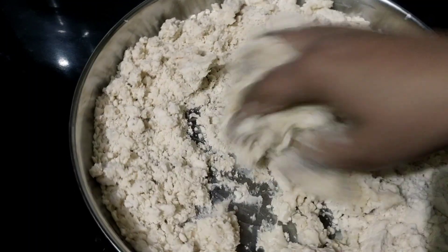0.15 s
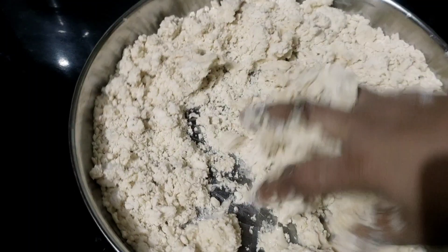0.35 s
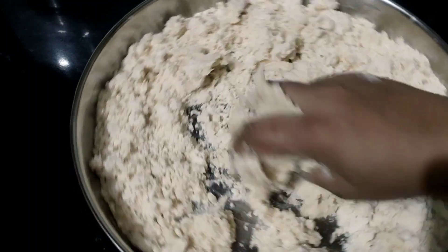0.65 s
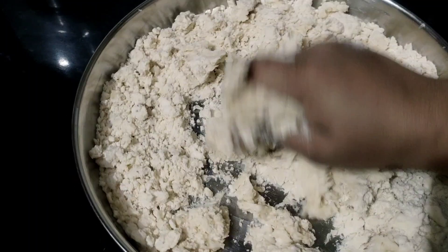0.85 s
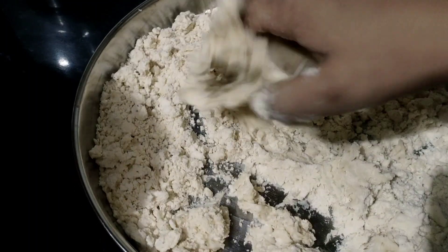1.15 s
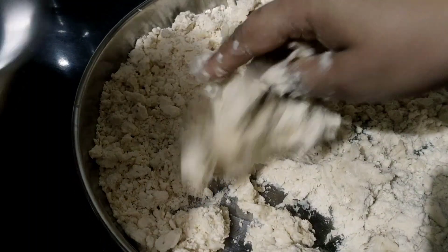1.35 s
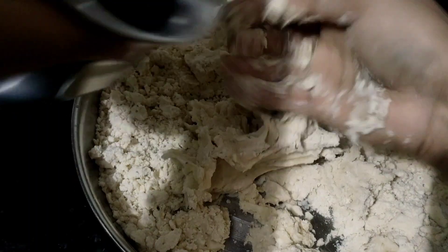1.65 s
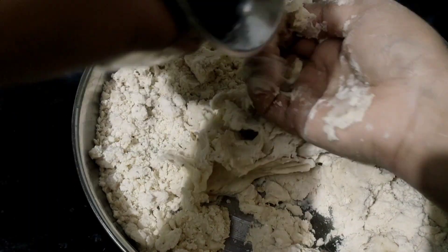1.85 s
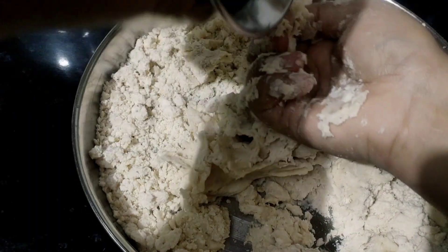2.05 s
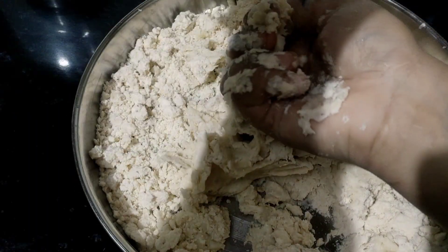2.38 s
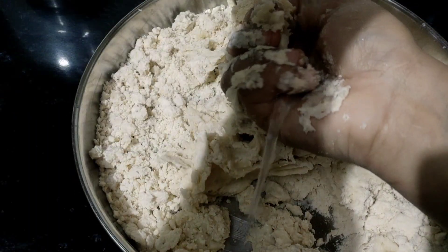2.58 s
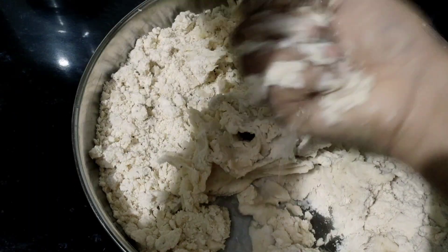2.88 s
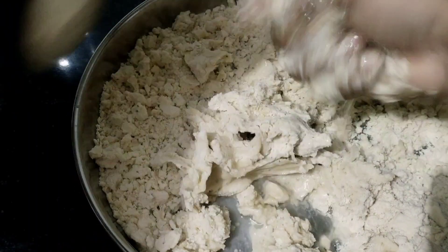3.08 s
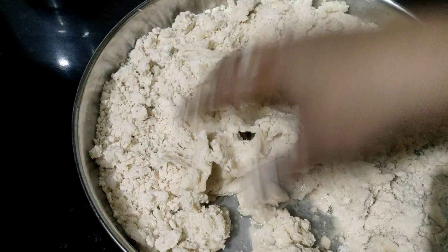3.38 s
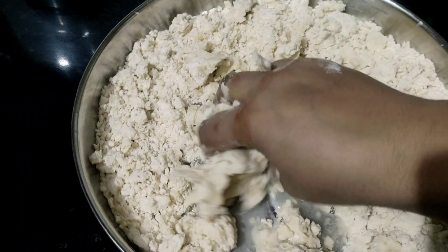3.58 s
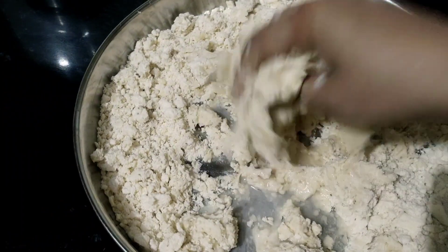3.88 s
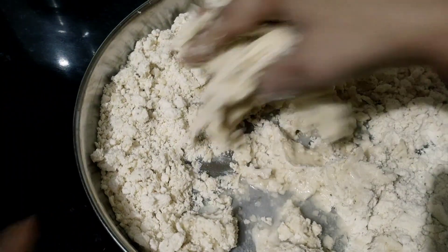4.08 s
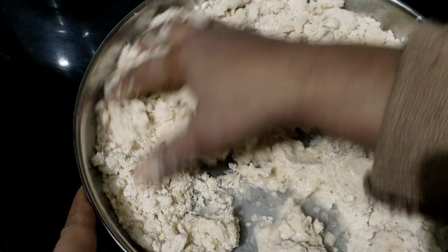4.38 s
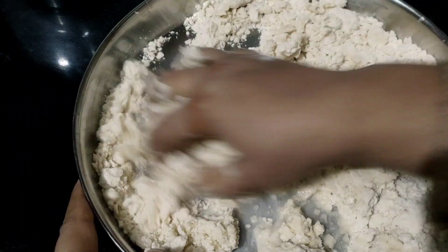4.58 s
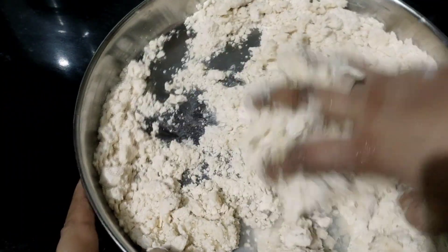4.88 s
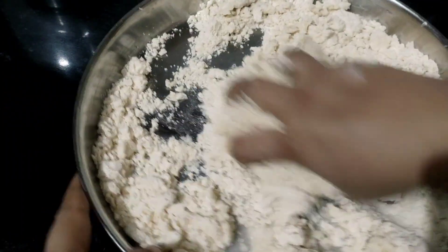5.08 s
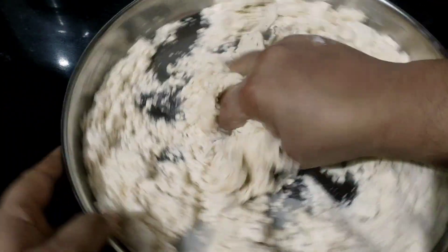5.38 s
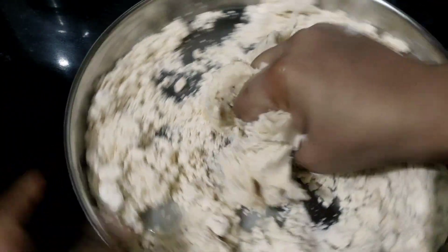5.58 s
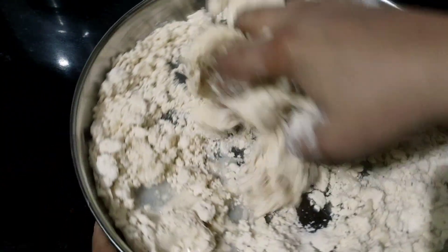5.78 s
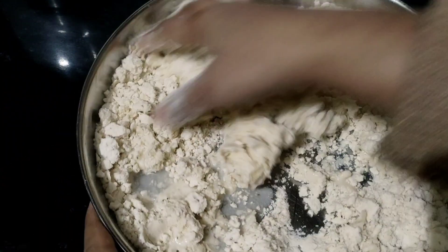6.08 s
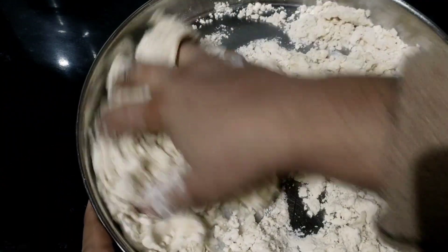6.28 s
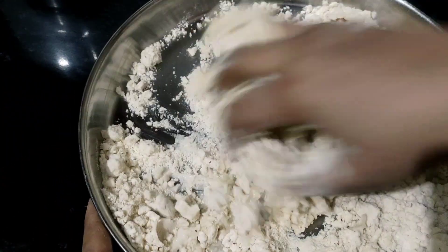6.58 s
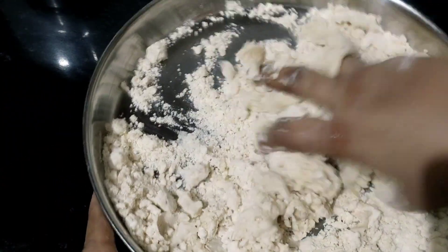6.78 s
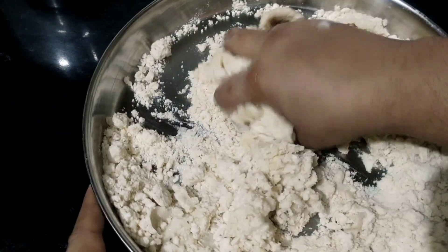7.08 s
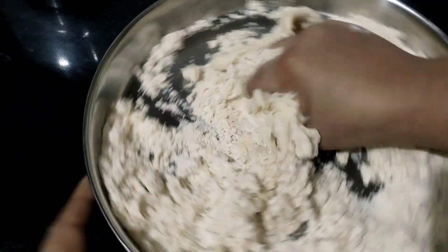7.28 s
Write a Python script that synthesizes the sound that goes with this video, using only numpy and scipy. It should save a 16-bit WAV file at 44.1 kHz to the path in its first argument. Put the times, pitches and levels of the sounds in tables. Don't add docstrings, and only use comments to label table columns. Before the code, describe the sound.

A close stereo phone pickup in a hard, lively kitchen, with a low house drone that is strongest at first and then eases. From 0 to 0.6 s, knuckles knock dully on a dough-damped steel plate, crumbs rub, and a nail judders at 0.5. Soft knocks follow at 0.8 and 1.0, a brushing stroke at 1.2, and a faint unsteady pipe whine until about 2.1. Water trickles from 2.5 to 3.3, with fine bubbling and bright plinks, clearest near 3.0 to 3.2. A far horn wavers from 2.9 to 4.4. At 3.56 a steel tumbler lands hard, the loudest sound, rings, touches again and rocks at 3.8. From 4.1, grainy kneading swishes return with small bangle clinks, a low air puff at 5.7 left, and a bright clink at 6.1. A firmer thud and rub come at 6.95, a light clink at 7.15, and a fluttering, buzzing horn from 7.0 to the end at about 7.4.

```python
import sys
import numpy as np
from scipy import signal
from scipy.fft import rfft, irfft
from scipy.io import wavfile
from scipy.ndimage import uniform_filter1d

SR = 44100
rng = np.random.default_rng(int(sys.argv[2]) if len(sys.argv) > 2 else 0)


def ratio_of_db(decibels):
    return 10 ** (np.asarray(decibels, float) / 20)


def wav_out(sig):
    wavfile.write(sys.argv[1], SR, np.round(np.clip(np.atleast_2d(sig).T, -1, 1) * 32767).astype(np.int16))


N = 328104
TIME = np.arange(N) / SR
SIDES = np.array([[.5], [-.5]])

# (centre [Hz], width [Hz], gain [dB])
STEEL_GAPS = [(4280, 330, -14), (6250, 480, -12)]


def on_log(table, hz, column=1):
    table = np.array(table)
    return np.interp(np.log(hz + 1), np.log(table[:, 0]), table[:, column])


def colour(x, table):
    hz = np.arange(x.shape[-1] // 2 + 1) * SR / x.shape[-1]
    octaves_beyond = np.log2(np.clip(hz + 1, table[0][0], table[-1][0]) / (hz + 1))
    gain = ratio_of_db(on_log(table, hz) - 36 * abs(octaves_beyond))
    return irfft(rfft(x) * gain / np.sqrt(np.mean(gain ** 2)), x.shape[-1])


def notch(x, dips):
    hz = np.arange(N // 2 + 1) * SR / N
    gain_db = sum(db * np.exp(-((hz - dip_hz) / width * 2) ** 2) for dip_hz, width, db in dips)
    return irfft(rfft(x) * ratio_of_db(gain_db), N)


def curve(table):
    s, db = np.transpose(table)
    return np.interp(TIME, s, db)


def walk(rate):
    k = int(SR / rate)
    held = np.repeat(rng.standard_normal(N // k + 1), k)
    return 1.7 * uniform_filter1d(uniform_filter1d(held, k), k)[:N]


def add(out, s, sound, pan_db=0):
    i = int(s * SR)
    sound = sound[..., :N - i]
    out[:, i:i + sound.shape[-1]] += sound * ratio_of_db(pan_db * SIDES)


def correlate(mid, side, likeness):
    c = np.clip(likeness, 0, 1)
    return np.sqrt((1 + c) / 2) * mid + np.sqrt((1 - c) / 2) * side * 2 * SIDES


def pair(likeness, count=N):
    mid, side = rng.standard_normal((2, count))
    return correlate(mid, side, likeness)


def ring(modes, seconds, flutter_db, scatter=1):
    hz, db, t60 = np.transpose(modes)[:, :, None]
    t = np.arange(int(seconds * SR)) / SR
    steps = rng.standard_normal((2, len(modes), len(t) // 500 + 1))
    flutter = uniform_filter1d(np.repeat(steps, 500, axis=2), 500)[..., :len(t)]
    flutter = flutter * (1 - np.exp(-t / .03))
    phase = 2 * np.pi * (hz * t + scatter * rng.random(hz.shape)) + .05 * flutter_db * flutter
    decay = np.exp(-np.log(1000) * t / t60)
    onset = 1 - np.exp(-t / 0.00054)
    return np.sum(ratio_of_db(db + flutter_db * flutter) * decay * np.sin(phase), axis=1) * onset


def house():
    # (frequency [Hz], correlation [0-1])
    coherence = [(100, 0.98), (300, .85), (700, .6), (3000, 0), (8000, 0)]
    # (frequency [Hz], density [dB per Hz])
    spectrum = [(56, 0.5), (156, -1), (240, -20), (350, -21), (480, -33.5), (1900, -45.5), (5460, -61.5),
                (15000, -53)]
    # (time [s], level [dB])
    bass_level = [
        (0.0, -46.5),
        (2.5, -51),
        (5.66, -53.5),
        (5.86, -52),
        (7.44, -53.5),
    ]
    hz = np.arange(N // 2 + 1) * SR / N
    mid, side = rfft(rng.standard_normal((2, N)))
    both = colour(irfft(correlate(mid, side, on_log(coherence, hz)), N), spectrum)
    bass = signal.sosfiltfilt(signal.butter(2, 230, fs=SR, output="sos"), both)
    bass_rms = np.sqrt(uniform_filter1d(np.mean(bass ** 2, axis=0), 6000))
    return bass / bass_rms * ratio_of_db(curve(bass_level) - 2.5) + (both - bass) * ratio_of_db(-47.0)


def blows(groups):
    # (frequency [Hz], width [Hz], level [dB])
    plate_modes = [(298, 45, 4.5), (359, 51, -2.5), (460, 360, -9.5), (575, 70, 4), (672, 150, -8.5),
                   (783, 46, -7), (899, 60, -7.5), (1027, 110, -7)]
    # (frequency [Hz], density [dB per Hz])
    knock_spectrum = [(500, -20.5), (900, -1), (1400, 0), (2100, 5), (3000, -3.5), (4500, -16.5)]
    tick_spectrum = [(2500, -11.5), (4000, -1.5), (7000, -1), (11000, 1.5), (15500, -6), (16500, -16)]
    crisp_spectrum = [(2500, -15.5), (4000, -6.5), (6800, -2), (8800, -4.5), (10500, 0.5), (14500, -0.5),
                      (15800, -6), (16500, -18)]
    thud, knock, tick, crisp = np.zeros((4, 2, N))
    t = np.arange(6000) / SR
    for table, rise, contact, hollow_db, is_crisp in groups:
        push = 1 - np.exp(-t / (rise * contact))
        ticking = crisp if is_crisp else tick
        for s, thud_db, hz, tick_db in table:
            place = signal.butter(2, [hz / 1.8, hz * 1.485], "band", fs=SR, output="sos")
            burst = pair(0.94, len(t)) * push * np.exp(-t / (1.69 * contact))
            add(thud, s, ratio_of_db(thud_db) * signal.sosfilt(place, burst))
            burst = pair(0.6, len(t)) * push * np.exp(-t / contact)
            add(knock, s, ratio_of_db((thud_db + tick_db) / 2 + hollow_db) * burst)
            burst = pair(0.91, len(t)) * push * np.exp(-t / (0.67 * contact))
            add(ticking, s, ratio_of_db(tick_db) * burst)
    plate = sum(ratio_of_db(db) * signal.lfilter(*signal.iirpeak(hz, hz / width, SR), thud)
                for hz, width, db in plate_modes)
    ticks = ratio_of_db(1.0) * colour(tick, tick_spectrum) + ratio_of_db(2.0) * colour(crisp, crisp_spectrum)
    return ratio_of_db(17.0) * plate + ratio_of_db(1.0) * colour(knock, knock_spectrum) + ticks


def clacks():
    # (time [s], level [dB], frequency [Hz], t60 [s])
    bare_patches = [(.405, -29, 739, 0.18), (.405, -36.5, 1954, .07), (3.558, -21.5, 1064, .07),
                    (.014, -22.5, 385, 0.15), (.166, -32.5, 333, .1), (0.407, -43, 2900, .05),
                    (3.07, -40.5, 1650, 0.068), (3.806, -27, 904, .08), (5.066, -32, 271, 0.12),
                    (.78, -44, 6040, 0.037), (0.78, -30, 2020, 0.034), (0.781, -38.5, 1397, 0.17),
                    (3.073, -41, 1730, 0.034), (3.225, -45.5, 1670, 0.034), (4.36, -42, 1276, 0.055),
                    (4.475, -41, 442, 0.15), (5.067, -31.5, 400, 0.15), (5.24, -50.5, 993, 0.077),
                    (6.04, -48, 909, 0.25), (6.079, -37, 1290, 0.08), (6.256, -53, 1108, 0.093)]
    out = np.zeros((2, N))
    for s, db, hz, t60 in bare_patches:
        modes = [(hz * k, db - 11, max(0.9 * t60, .02)) for k in (.84, .92, 1, 1.1, 1.22)]
        add(out, s, ring(modes, 0.32, flutter_db=6.0))
    return out


def kneading():
    # (time [s], thud level [dB], thud frequency [Hz], tick level [dB])
    knuckles = [(.013, -23, 470, -46), (.0145, -33, 890, -56), (.069, -39.5, 424, -53),
                (.165, -27, 620, -24.5), (.179, -30.5, 327, -42), (4.489, -51, 500, -56.5),
                (5.062, -34, 320, -42), (5.239, -60, 293, -59), (5.526, -55, 355, -47),
                (5.614, -54.5, 244, -47.5), (5.646, -50, 299, -60), (6.084, -38, 253, -69),
                (6.935, -34, 350, -55.5), (6.951, -45, 352, -31), (6.969, -33.5, 285, -56.5)]
    raps = [
        (.039, -27.5, 370, -55),
        (.496, -47.5, 270, -39.5),
        (4.362, -65, 221, -56),
        (.157, -39.5, 230, -47),
        (7.003, -49, 240, -51),
    ]
    cracks = [(3.071, -80, 358, -41.5), (3.141, -66, 310, -43.5), (4.454, -56, 300, -49),
              (6.799, -75, 270, -63), (6.757, -80.5, 250, -62.5), (6.768, -83.5, 250, -62),
              (5.0665, -82, 305, -33), (.293, -86, 305, -59), (2.530, -96, 305, -67),
              (3.105, -85, 300, -58), (2.7, -85, 300, -56), (3.018, -85, 300, -56), (3.031, -85, 300, -51),
              (2.2, -85, 300, -56), (3.7, -85, 300, -52), (3.177, -85, 300, -59), (3.8, -85, 300, -59.5),
              (3.199, -85, 300, -57), (2.693, -90, 300, -60), (6.3, -70, 260, -52), (4.7, -58, 270, -47),
              (6.534, -63, 280, -54), (3.33, -90.5, 300, -60), (7.8, -46, 280, -39), (6.016, -53, 460, -53)]
    nail = [
        (.519, -57, 270, -33.5),
        (.534, -57, 270, -33.5),
        (.540, -61, 268, -35.5),
        (.561, -57, 270, -32),
        (.578, -68, 270, -39.5),
        (.592, -67, 270, -39.5),
        (6.777, -74, 240, -36.5),
    ]
    lumps = [(5.064, -55.5, 298, -33), (.975, -47.5, 598, -77), (.402, -41, 696, -71),
             (.408, -39.5, 330, -62), (1.03, -48.5, 360, -57), (4.471, -47.5, 313, -54),
             (5.652, -51.5, 293, -51), (6.024, -43.5, 275, -67), (6.05, -38.5, 265, -77),
             (6.25, -42.5, 291.4, -67.5), (6.526, -60, 310, -44.5)]
    clod = [(.779 + .041 * k, -57 - 6.5 * k, 297, -54.5 - 6.5 * k) for k in range(4)]
    sticky = [(2.8 + .42 * u, -90, 297, -57.5 - 8 * u + 9 * v) for u, v in rng.random((16, 2))]
    # (contacts, share of contact spent rising, contact [s], knock over mean of thud and tick [dB], crisp)
    groups = ((knuckles, .08, .0062, 2.5, False), (raps, .08, .0043, 11, False), (cracks, .08, .006, -11, True),
              (nail, .12, .005, 2, True), (clod, .08, .005, 17, False), (sticky, .08, .002, -20, False),
              (lumps, .45, .012, -4, False))
    return blows(groups) + clacks()


def strokes(table, settling_db, fall_db):
    start, length, db, heavy_db = np.transpose(table)[:, :, None]
    t = TIME[::50]
    rise_db_per_s = 329.5
    db = db - rise_db_per_s * np.clip(start - t, 0, None) - fall_db * np.clip(t - start - length, 0, None)
    return [np.interp(TIME, t, np.sum(ratio_of_db(zone_db), axis=0) + ratio_of_db(settling_db)) for zone_db in (db, db + heavy_db)]


def rub(table, settling_db, fall_db):
    # (frequency [Hz], density [dB per Hz])
    treble = [(2500, -16.5), (4000, -5), (6500, 1.5), (8500, 0), (10500, 2.5), (15300, -0.5), (15900, -15)]
    middle = [(700, -14), (1200, -7.5), (2200, 3), (3500, -0.5), (6000, -9)]
    out = 0
    for gain, zone in zip(strokes(table, settling_db, fall_db), (treble, middle)):
        sizes = np.minimum(rng.exponential(size=N // 40 + 1), 5)
        crumbs = ratio_of_db(1.6 * np.repeat(sizes, 40)[:N] - 1.5 + 0.5 * walk(25))
        out = out + gain * ratio_of_db(1.5) * colour(pair(0.11) * crumbs, zone)
    return out


def friction():
    # (start [s], length [s], level [dB], middle over treble [dB])
    flour_strokes = [(0.033, 0.05, -59.5, 3), (0.211, 0.025, -68.5, 14), (0.548, 0.03, -57, 3.5),
                     (0.78, 0.17, -87, 1), (1.018, 0.018, -73, 0), (1.208, 0.13, -72.5, -11),
                     (1.536, 0.46, -84.5, -3.5), (2.71, 0.048, -73, -20), (3.008, 0.24, -70.5, -6),
                     (3.3, 0.077, -72.5, -18), (0.1, 0.042, -67, -12), (4.138, .25, -82.5, -9.5),
                     (4.462, 0.15, -64.5, -4.5), (4.65, 0.048, -65.5, -3), (4.84, 0.089, -75.5, 0),
                     (5.0, 0.016, -81, 4), (5.818, 0.015, -75.5, -3), (0.784, 0.014, -76, -2),
                     (5.077, 0.15, -67.5, -3.5), (5.267, 0.059, -61, -5), (5.416, 0.19, -69, 1.5),
                     (5.559, 0.089, -63.5, -7.5), (5.87, 0.064, -78, -12), (6.1, 0.012, -70, -20),
                     (6.233, 0.27, -71.5, -8.5), (6.56, 0.028, -70.5, 0.5), (4.584, 0.065, -66, -11),
                     (.86, .1, -83, -10), (1.038, 0.021, -77, -6), (6.963, 0.21, -62, 2),
                     (7.233, 0.23, -77.5, 4)]
    swipes = [
        (4.69, 0.071, -57.5, -1.5),
        (4.905, 0.048, -71.5, 2.5),
        (5.79, 0.057, -64.5, -10),
        (6.527, .05, -65, 5.5),
        (6.795, .014, -72, -8),
        (6.846, 0.014, -71, -10),
        (6.928, .006, -72, 0),
        (4.165, .03, -77, -25),
    ]
    return rub(flour_strokes, -91.5, 200) + rub(swipes, -120, 600)


def bumps():
    # (time [s], level [dB], frequency [Hz], length [s], left minus right [dB])
    puffs = [
        (0.502, -35.5, 75.2, 0.1, 2),
        (3.39, -46.5, 41, .08, 10),
        (3.585, -40.5, 78, .1, 0.5),
        (5.714, -35, 73, 0.061, 19.5),
        (5.717, -34.5, 35.44, .05, 21.5),
        (6.089, -43.5, 73.6, 0.1, 2.5),
        (6.651, -47.5, 100, 0.11, -1.5),
        (6.96, -40.5, 178, 0.064, 5),
        (3.56, -41.5, 130.1, .1, 1),
    ]
    out = np.zeros((2, N))
    for s, db, hz, length, pan_db in puffs:
        t = np.arange(int(length * SR)) / SR
        swell = ratio_of_db(db) * np.sin(np.pi * t / length)
        add(out, s, swell * np.sin(2 * np.pi * hz * t * (1 + 1.8 * t)), pan_db)
    return out


def tumbler():
    # (frequency [Hz], level [dB], t60 [s])
    base_modes = [(1624, -32, .2), (2152, 6, .22), (2196, -2.5, 0.16), (2623, -8, 0.32), (2813, -12.5, .35),
                  (2880, -20.5, .25), (3078, -14, 0.33), (3150, -17, .3), (3540, -23.5, 0.28),
                  (3620, -18.5, .2), (3800, -25.5, .25), (4650, -19, .22), (5630, -19.5, 0.17),
                  (5740, -24, .15)]
    rim_modes = [(620, -10, .45), (1618, -14.5, 0.29), (2230, -14, .45), (2155, -2, 0.23), (2632, -6, 0.52),
                 (2900, -6, .2), (3062, -8.5, 0.28), (3530, -19, .4), (3870, -22.5, 0.37),
                 (5406, -12, 0.11), (5600, -17.5, .25), (6580, -23.5, 0.298), (7569, -27, .25),
                 (8900, -18, .1)]
    lip_modes = [(2150, 0, 0.19), (2580, 1, 0.28), (3095, -18, .25), (3828, -19, .14), (5500, 4.5, 0.078),
                 (5600, 1, 0.066), (6570, -10, .1)]
    # (time [s], level [dB], rattle [s], left minus right [dB])
    base_strikes = [
        (3.558, -16.5, .001, -5.5),
        (3.632, -26.5, .02, -5.5),
    ]
    rim_strikes = [
        (3.612, -29, 0.0048, -2),
        (3.81, -27, 0.0031, -5),
        (4.048, -56, .04, -3),
    ]
    lip_strikes = [
        (1.022, -54, 0.021, -1),
    ]
    # (frequency [Hz], level [dB])
    crowding = [(1900, -23.5), (3900, -27), (4100, -45), (4450, -45), (4600, -28), (5900, -29),
                (6250, -45.5), (6700, -32)]
    choke_s = 3.618
    out = np.zeros((2, N))
    crowd = [(1900 * 6 ** u, on_log(crowding, 1900 * 6 ** u) + 5 * v, .22 - .08 * u)
             for u, v in rng.random((48, 2))]
    for modes, strikes in ((base_modes, base_strikes), (rim_modes, rim_strikes), (lip_modes, lip_strikes)):
        for s, db, rattle, pan_db in strikes:
            sound = ring(modes + crowd, 0.6, flutter_db=3.5, scatter=.3)
            t = np.arange(sound.shape[1]) / SR
            build = 1 - np.exp(-t / (0.3 * max(rattle, .0003)))
            if s < choke_s - .03:
                build = build * ratio_of_db(-13 * np.clip((s + t - choke_s) / .008, 0, 1))
            add(out, s, ratio_of_db(db) * build * sound, pan_db)
    return notch(out, STEEL_GAPS)


def horn(table, hz, orders, wobble, rate, flutter_db):
    sounding = (TIME > table[0][0]) & (TIME < table[-1][0] + .02)
    on = uniform_filter1d(1. * sounding, 900)
    out = 0
    for k, order_db in orders:
        waver = 1 - wobble * (np.minimum(walk(rate) ** 2, 3) - .3)
        phase = 2 * np.pi * np.cumsum(round(k) * hz * waver) / SR
        flutter = flutter_db * min(k / 9, 1) * np.array([walk(70), walk(70)])
        out = out + ratio_of_db(order_db + flutter) * np.sin(phase)
    return out * ratio_of_db(curve(table) - 0.5) * on


def pipe_whine():
    # (time [s], level [dB])
    whine_level = [
        (1.2, -77),
        (1.35, -78.5),
        (1.95, -80),
        (2.15, -90.5),
    ]
    return horn(whine_level, 830, [(0.96, 0)], 0.055, 130, 31.0)


def bubble(hz, cycles, glide=0.11):
    u = np.arange(int(cycles * SR / hz) + 2) * hz / (cycles * SR)
    return np.sin(2 * np.pi * cycles * (u + glide * u ** 2)) * (1 - np.exp(-u / 0.056)) * np.exp(-u / 0.32)


def water():
    # (time [s], level [dB], frequency [Hz])
    drops = [(2.6754, -52, 3470), (2.6797, -43.5, 2860), (2.688, -48, 3000), (2.6975, -47, 2810),
             (2.754, -54, 2900), (2.958, -53, 2900), (2.968, -53, 4700), (3.255, -52, 2900),
             (2.7946, -48, 2800), (2.802, -48, 2900), (2.822, -53, 3500), (2.849, -46, 3150),
             (2.8817, -44.5, 2850), (2.9996, -37.5, 2990), (3.0165, -44.5, 2550), (3.0723, -28.5, 2690),
             (3.1406, -48.5, 2800), (3.2257, -39.5, 3320)]
    # (time [s], level [dB], frequency [Hz])
    splashes = [
        (2.6609, -43.5, 6400),
        (2.7903, -31, 6460),
        (2.8095, -42, 5840),
        (2.901, -47.5, 4460),
        (3.0394, -40, 5850),
        (3.0394, -36.5, 5000),
        (3.1662, -43, 7720),
    ]
    # (start [s], length [s], frequency [Hz], spread [octaves], level [dB])
    swarms = [(2.525, 0.073, 3500, 0.11, -76), (2.66, .2, 5300, .3, -76), (2.5, .19, 5080, .07, -71),
              (2.51, .22, 6500, .08, -74), (2.53, .25, 6150, .1, -74), (2.6, 0.25, 6700, .6, -62),
              (2.72, .19, 7300, 0.25, -67), (2.74, .17, 3100, 0.55, -67), (2.7, .35, 4000, 1.2, -66),
              (2.66, 0.16, 8100, .5, -67), (2.5, .45, 6200, 1.23, -63.5), (2.5, .12, 4700, 0.33, -73),
              (3.7, 0.38, 8300, 1.0, -65)]
    out = np.zeros((2, N))
    for table, cycles, pan_db in ((drops, 15, -1.5), (splashes, 11, -3)):
        for s, db, hz in table:
            add(out, s, ratio_of_db(db + 4.0) * bubble(hz, cycles), pan_db)
    for start, length, hz, spread, db in swarms:
        cycles = 30 / spread ** .4
        for when, pitch, size, place in rng.random((130, 4)):
            grain = bubble(hz * 2 ** (spread * (pitch - .5)), cycles, glide=0.016)
            swell = ratio_of_db(db + 1.5 - 1.6 * np.log(1 - size)) * np.sin(np.pi * when) ** .7
            add(out, start + when * length, swell * grain, 12 * (place - .5))
    return out


def far_horn():
    # (time [s], level [dB])
    far_level = [
        (2.9, -77),
        (2.96, -62.5),
        (3.55, -63.5),
        (4.3, -74.5),
        (4.47, -77),
    ]
    # (multiple [1], level [dB])
    far_orders = [(1, -6.5), (10, -20), (11, -4.5)]
    return horn(far_level, 345, far_orders, .022, 400, 4.0)


def landing():
    # (time [s], thud level [dB], thud frequency [Hz], tick level [dB])
    set_down = [
        (3.558, -9, 630, -22),
        (3.613, -22.5, 600, -32),
        (3.637, -22.5, 575, -47.5),
    ]
    rocking = [
        (3.796, -21, 602, -61),
        (3.807, -16, 660, -33),
        (3.824, -25, 660, -27.5),
        (3.841, -42, 557, -46),
    ]
    return blows(((set_down, .04, .005, 2.5, False), (rocking, .45, .012, -4, False)))


def rattling():
    # (start [s], length [s], level [dB], middle over treble [dB])
    rattles = [
        (3.603, 0.1, -61.5, 15),
        (3.826, 0.027, -60, 20),
        (3.945, 0.15, -73.5, 3.5),
    ]
    return notch(rub(rattles, -120, 200), STEEL_GAPS)


def bangles():
    # (frequency [Hz], level [dB], t60 [s])
    glass_modes = [(4130, -0.5, .2), (4300, -1, 0.3), (7910, -6.5, 0.35), (8110, -3.5, 0.29),
                   (12600, -5, 0.13), (12800, 1.5, 0.13), (13060, 3, 0.096), (13410, -16, .06),
                   (14400, -5, 0.12)]
    # (time [s], level near 4 kHz [dB], near 8 kHz [dB], near 13 kHz [dB], left minus right [dB])
    clinks = [(4.1622, -66, -38.5, -39, -7), (4.1616, -66.5, -47, -44, 6), (4.336, -70, -48.5, -44, 6),
              (4.4716, -75.5, -56.5, -56, -8.5), (4.7775, -73, -53.5, -46, 4.5),
              (4.8044, -85, -57, -55.5, 1.5), (6.087, -58.5, -40, -34, -13.5), (6.0959, -47.5, -50, -43, 7),
              (6.3488, -70, -55.5, -51.5, -2.5), (7.1501, -68, -47, -44, -1.5)]
    out = np.zeros((2, N))
    for s, low_db, mid_db, high_db, pan_db in clinks:
        touch = [(4200, low_db), (8000, mid_db), (13000, high_db)]
        modes = [(hz, db + on_log(touch, hz), 0.61 * t60) for hz, db, t60 in glass_modes]
        add(out, s, ratio_of_db(1) * ring(modes, .35, flutter_db=4.5), pan_db)
        tick = np.diff(pair(.5, count=1500), 2) * np.exp(-np.arange(1498) / (0.004 * SR))
        add(out, s, ratio_of_db(high_db - 15) * tick, pan_db)
    return out


def near_horn():
    # (time [s], level [dB])
    near_level = [
        (7.02, -58),
        (7.062, -49),
        (7.09, -54),
        (7.146, -46),
        (7.238, -58.5),
        (7.256, -48.5),
        (7.348, -56.5),
        (7.374, -47.5),
        (7.44, -46.5),
    ]
    # (multiple [1], level [dB])
    near_orders = [(1, -6), (2, -16), (3, -29), (6, -23), (7, -15), (8, -12), (9, 3), (10, -16), (11, -23)]
    direct = horn(near_level, 349.6, near_orders, .004, 130, 2.2)
    return direct + ratio_of_db(-5.5) * horn(near_level, 345.7, near_orders[3:], .008, 200, 3.4)


def kitchen(x, likeness):
    # (frequency [Hz], t60 [s])
    reverberation = [(150, 0.23), (600, 0.52), (2500, 0.32), (8000, 0.23), (15000, 0.2)]
    t = np.arange(SR // 2) / SR
    noise, tail = pair(likeness, len(t)), 0
    for hz in 90 * 2. ** np.arange(8):
        octave = signal.butter(2, [hz / np.sqrt(2), hz * np.sqrt(2)], "band", fs=SR, output="sos")
        tail = tail + signal.sosfilt(octave, noise) * np.exp(-np.log(1000) * t / on_log(reverberation, hz))
    tail = tail * (1 - np.exp(-t / 0.0013))
    mono = np.mean(x, axis=0, keepdims=True)
    return signal.fftconvolve(mono, tail / np.linalg.norm(tail[0]), axes=1)[:, :N]


def scene():
    hits, fine = kneading(), bangles() + water()
    landed, steel = landing(), tumbler()
    far = pipe_whine() + far_horn() + near_horn()
    echoing = ratio_of_db(-8.0) * hits + ratio_of_db(-7.5) * notch(landed, STEEL_GAPS) + ratio_of_db(-7.5) * steel
    echoing = echoing + ratio_of_db(-16.5) * fine + ratio_of_db(-0.5) * far
    direct = hits + landed + steel + fine + far
    return direct + kitchen(echoing, 0.49) + friction() + rattling() + bumps() + house()


def low_pass(x):
    return signal.sosfilt(signal.butter(12, 16650, fs=SR, output="sos"), x)


def record(dry):
    # (frequency [Hz], left lead [rad], left minus right [dB])
    ports = [(60, 0.31, 0), (310, -0.48, 3), (575, -2.5, 4.5), (1450, -2, -3.5), (2230, -5, -1),
             (4500, -5.5, -0.5), (9020, -4.5, 1.5)]
    # (centre [Hz], width [Hz], gain [dB])
    body_dips = [(4330, 89, -6.5), (1696, 66, -1.5), (6320, 350, -5), (8440, 700, -3.5)]
    hz = np.arange(N // 2 + 1) * SR / N
    shade = ratio_of_db(on_log(ports, hz, column=2) * SIDES)
    lead = np.exp(1j * on_log(ports, hz) * SIDES)
    at_ports = irfft(rfft(notch(dry, body_dips)) * shade * lead * (hz < 16600), N)
    return low_pass(np.tanh(at_ports / .95) * .95)


dry = scene()
out = record(dry)
wav_out(out)
```